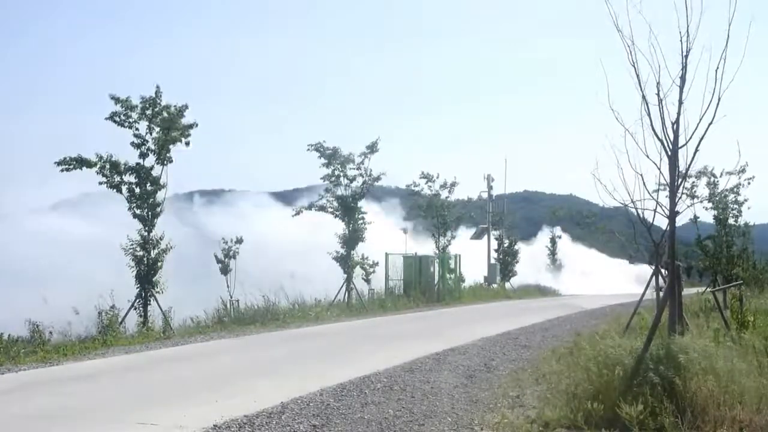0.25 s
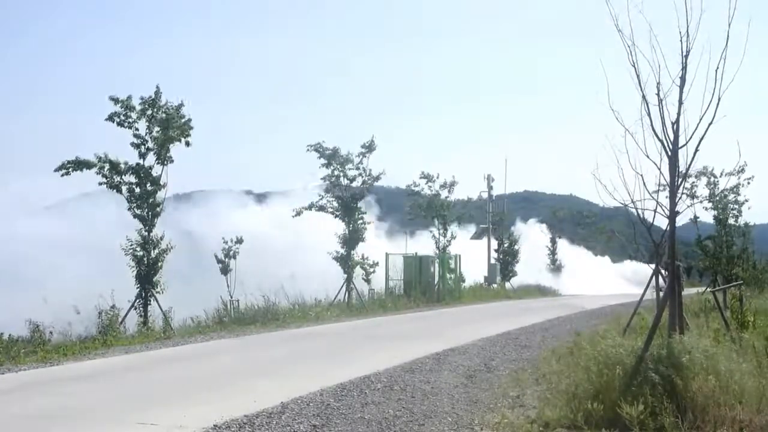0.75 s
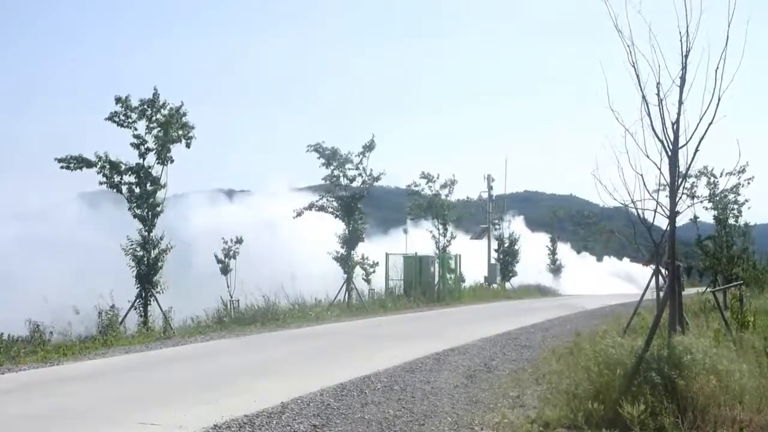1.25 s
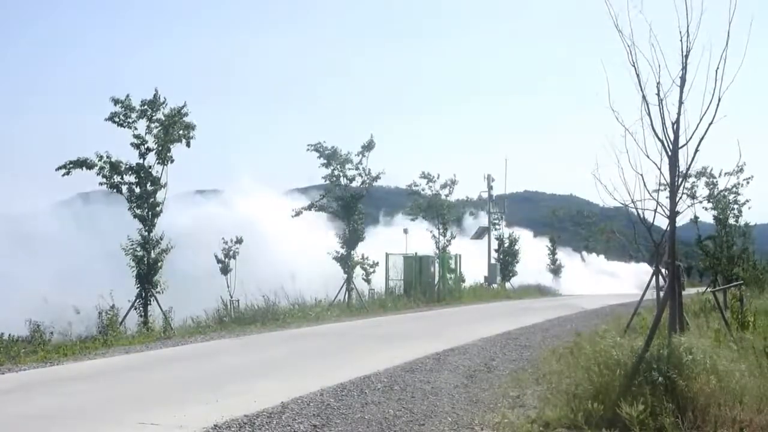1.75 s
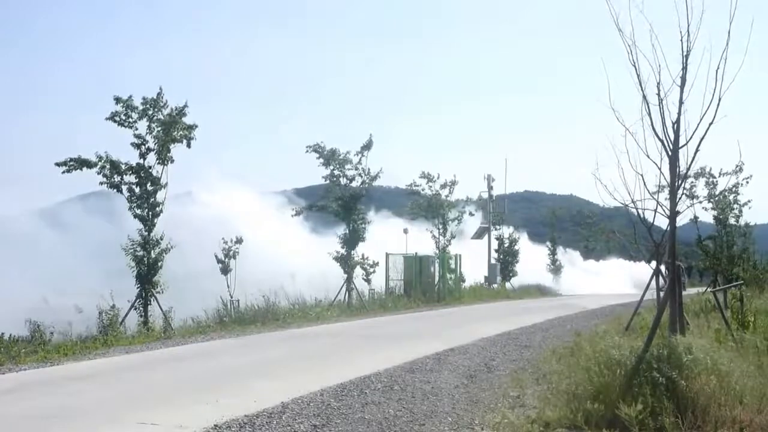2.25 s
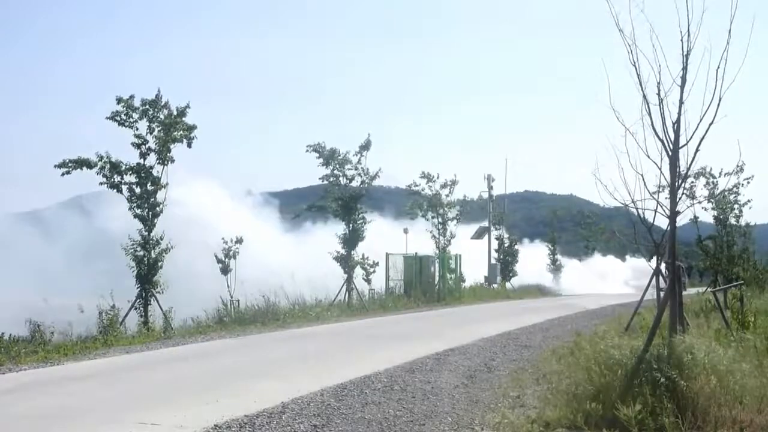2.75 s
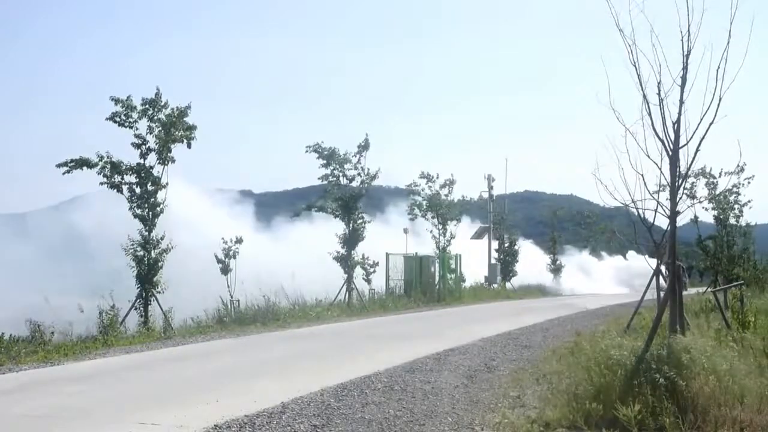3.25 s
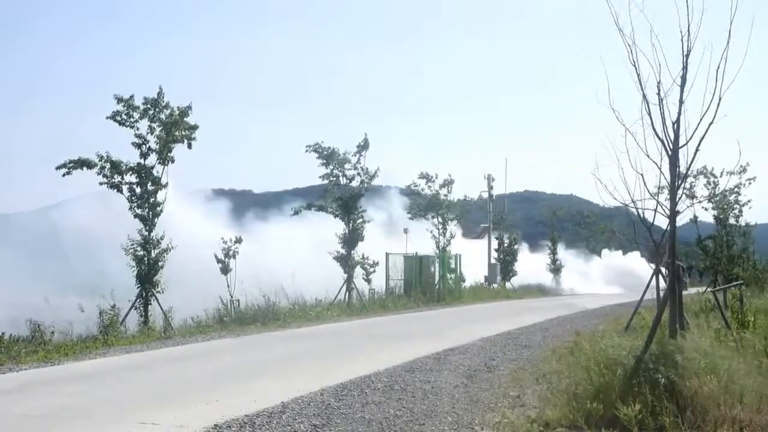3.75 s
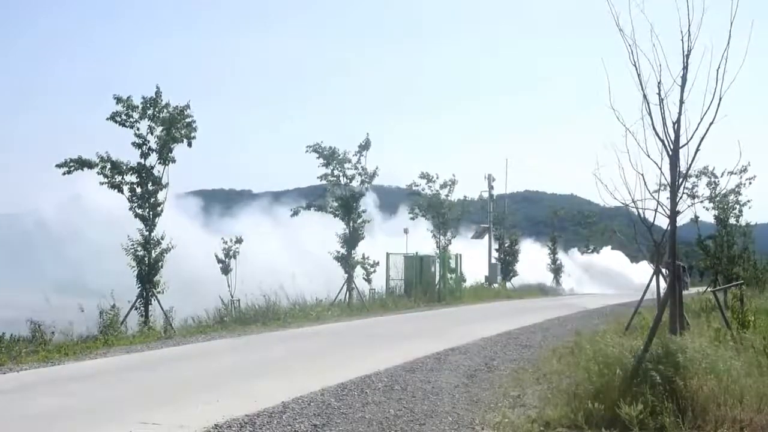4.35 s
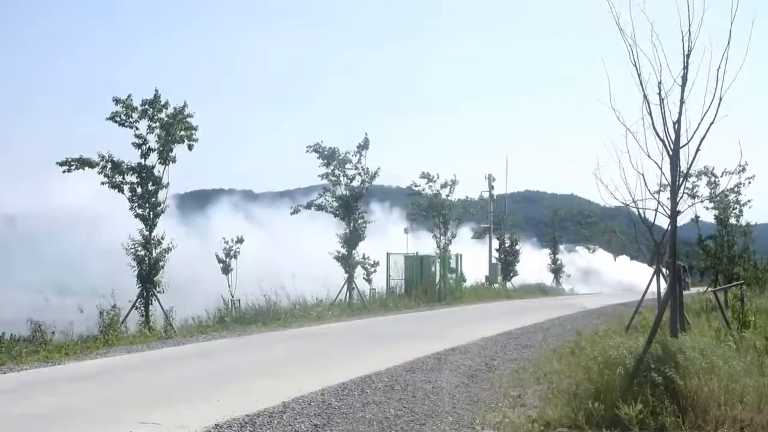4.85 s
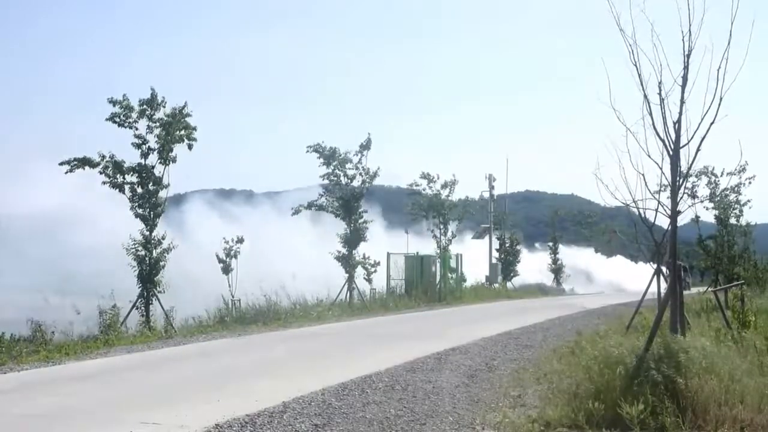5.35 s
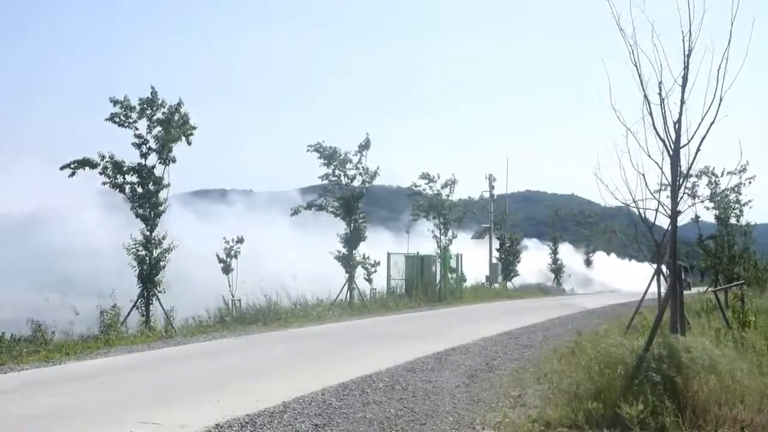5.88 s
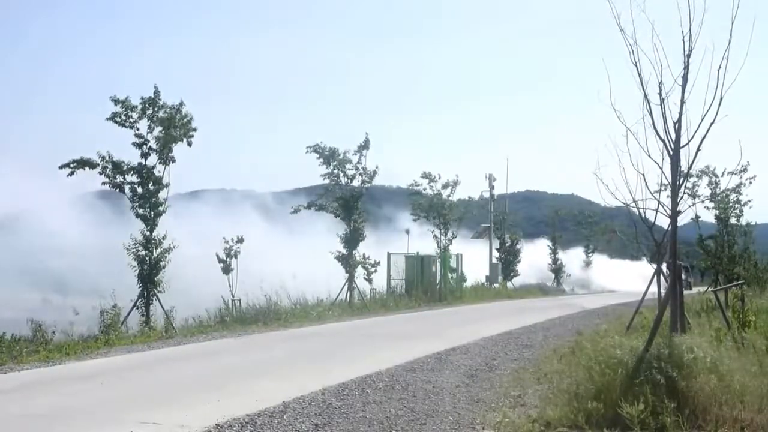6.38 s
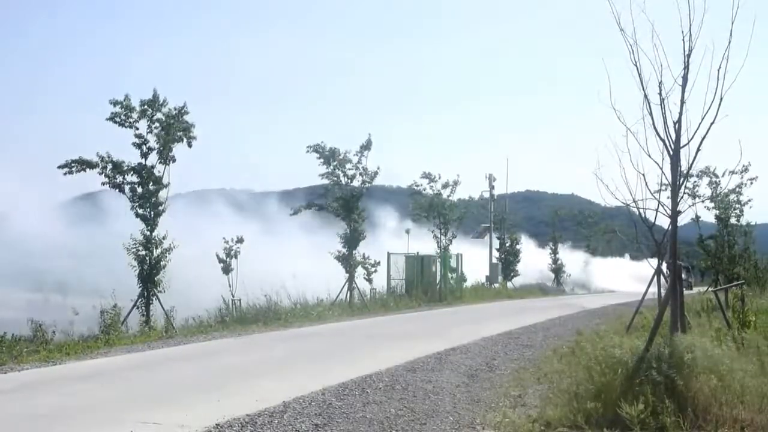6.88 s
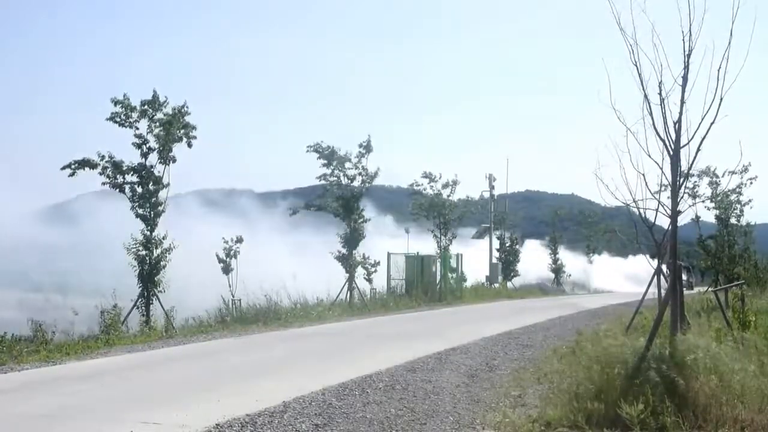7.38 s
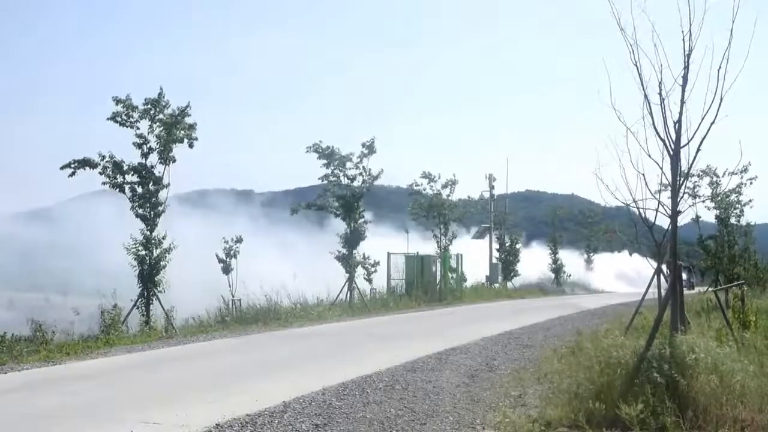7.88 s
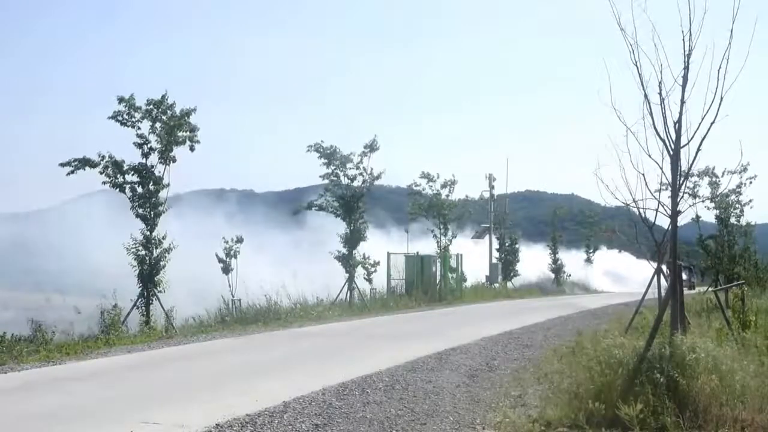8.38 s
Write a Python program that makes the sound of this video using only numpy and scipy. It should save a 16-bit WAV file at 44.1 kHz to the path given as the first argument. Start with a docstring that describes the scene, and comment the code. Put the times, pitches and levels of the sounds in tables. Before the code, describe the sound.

A continuous open-air roadside scene of about 8.6 seconds. Far off and roughly central, a pulse-jet fogger drones near 80 and 160 Hz, two tubes beating almost three times a second, with a hollow ringing exhaust roar, weak airy hiss and a faint swaying engine hum. Moving air makes it swell and dip; hiss surges at 0.3-1 s and most clearly at 3.5-4.3 s, its colour then shifting, with roar lifts around 6.5 and 8.5 s. Louder wind rumbles at the microphone, uneven between channels: the left is smoother, swelling at 3.3 s; the right flutters, thumps throughout and slaps in clusters at 1-1.5, 2.3-2.8, 3.9, 5-5.4 and 7.4-7.6 s. Brief lulls come near 6.4 and 8 s. Tiny bright insect- or bird-like ticks appear at 6.8, 7.3, 7.55 and 8.2-8.3 s.

```python
"""Distant pulse-jet fogger in wind.

A twin-tube fogger drones far down a country road: its tubes fire near 80 times a second and beat.
Pulsed noise rings in the exhaust pipes and hisses from the nozzle; a swaying sine is the carrier's engine.
Moving air makes the machine swell and fade. Shaped noise buffets the microphone, with thumps and slaps
strongest on the right port; a few small bright ticks sound close by."""
import sys
import numpy as np
from scipy import signal
from scipy.fft import rfft, irfft, next_fast_len
from scipy.io import wavfile
from scipy.ndimage import uniform_filter1d, map_coordinates

SR = 44100
rng = np.random.default_rng(int(sys.argv[2]) if len(sys.argv) > 2 else 0)


def master_out(mix):
    """Clip the mix to full scale and print it as 16-bit PCM to the path in sys.argv[1]."""
    frames = np.transpose(np.atleast_2d(mix))
    ceiling = np.clip(frames, -1, 1)
    pcm = np.round(ceiling * 32767).astype(np.int16)
    wavfile.write(sys.argv[1], SR, pcm)


N = 380274


def amp(db):
    """Decibels to gain."""
    return 10 ** (np.asarray(db) / 20)


def unit(x):
    """Scaled to rms 1."""
    return x / np.sqrt(np.mean(x ** 2) + 1e-20)


def curves(rows):
    """One value per sample for each column after the time."""
    s, *cols = np.transpose(rows)
    return [np.interp(np.arange(N) / SR, s, c) for c in cols]


def wobble(rate):
    """A smooth random curve, rate knots a second."""
    knots = rng.standard_normal(int(N * rate / SR) + 4)
    return map_coordinates(knots, [np.arange(N) * rate / SR])


def swells(rows, attack_s, release_s):
    """Gain of (start, length, dB) events: each rises, holds and lets go."""
    t = np.arange(N) / SR
    total = 0
    for start_s, length_s, db in rows:
        rise = np.clip((t - start_s) / attack_s + .5, 0, 1)
        fall = np.clip((start_s + length_s - t) / release_s + .5, 0, 1)
        total = total + amp(db) * rise * fall
    return total


def filtered(x, response):
    """x times a response of frequency."""
    m = next_fast_len(N + SR // 2)
    return irfft(rfft(x, m) * response(np.fft.rfftfreq(m, 1 / SR)), m)[..., :N]


def coloured(x, points):
    """x shaped by (Hz, dB) points on a log axis."""
    f, db = np.transpose(points)
    return filtered(x, lambda hz: amp(np.interp(np.log(hz + 1), np.log(f + 1), db)))


def peak(hz, centre_hz, width_hz):
    """Power response of one resonance with steep flanks."""
    return (1 + ((hz - centre_hz) / width_hz) ** 2) ** -4


def resonate(x, modes):
    """x through (Hz, width Hz, dB) resonances, summed in power."""
    return filtered(x, lambda hz: np.sqrt(sum(amp(db) ** 2 * peak(hz, c, w) for c, w, db in modes)))


def noise_pair(alike):
    """Left and right white noise that share a part of their power."""
    share = np.clip(alike, 0, 1)
    return np.sqrt(share) * rng.standard_normal(N) + np.sqrt(1 - share) * rng.standard_normal((2, N))


def pan(lean_db):
    """Channel gains for a left-minus-right level."""
    return amp([[lean_db / 2], [-lean_db / 2]])


FIRING_HZ = 80.3
BEAT_HZ = 2.85  # mean excess of the second tube's firing rate


def firing_cycles(wander_hz, jitter, drift_hz):
    """Cycle count of each tube: a common fuel feed sways both, and burns come a little early or late."""
    rate_hz = FIRING_HZ + wander_hz * wobble(4)
    beat_hz = BEAT_HZ + drift_hz * wobble(0.99)
    return [np.cumsum(r) / SR + jitter * wobble(30) for r in (rate_hz, rate_hz + beat_hz)]


def puffs(cycles, depth):
    """Gas flow that surges once a firing."""
    return unit(np.exp(depth * np.cos(2 * np.pi * cycles)))


# Clean drone of one tube. Each row: multiple of the firing rate, level in dB.
DRONE_ORDERS = [(1, -0.5), (2, -1.5), (3, -37), (4, -19.5), (5, -28.5), (6, -23), (7, -25)]
DRONE_DB, DRONE_DB_PER_ROAR_DB = -30, 1  # mean level, gain per dB of roar
SECOND_TUBE_DB = -4  # against the first


def drone(tubes, swell_db, flicker_db):
    """Clean low orders of both tubes, throbbing as they drift in and out of step."""
    tone = 0
    for cycles, tube_db in zip(tubes, (0, SECOND_TUBE_DB)):
        for order, order_db in DRONE_ORDERS:
            gain = amp(tube_db + order_db + flicker_db * wobble(12))
            tone = tone + gain * np.cos(2 * np.pi * order * cycles)
    return amp(DRONE_DB + DRONE_DB_PER_ROAR_DB * swell_db) * unit(tone) * pan(-.5)


def wandering(x, share, rate):
    """x with its pitch swaying by a small share, as the gas heats and cools."""
    place = np.arange(N) + np.cumsum(share * wobble(rate))
    return np.array([map_coordinates(side, [place], mode="mirror") for side in x])


# Exhaust pipe resonances. Each row: centre in Hz, width in Hz, level in dB before the nozzle swings, dB after.
PIPE_MODES = [(201, 32, -7.5, -6), (285, 21, .5, 2), (317, 31, -6.5, -7.5), (404, 26, -12, -13.5),
              (447, 33, -17, -17), (480, 22, -9, -11.5), (556, 45, -16, -17), (587, 26, -9.5, -12.5),
              (640, 21, -17, -18), (700, 56, -17, -17), (805, 90, -22.5, -21.5), (983, 89, -24.5, -24),
              (1065, 24, -19.5, -19), (1215, 75, -25, -21), (1362, 65, -28, -29), (1469, 51, -31, -33)]
PIPE_WANDER = .009  # typical pitch sway, as a share


def exhaust(flow, swing):
    """The pipes ring, pulsing with the flow; their balance shifts as the nozzle swings round."""
    gas = noise_pair(0.96)
    before = resonate(gas, [(hz, width, db) for hz, width, db, _ in PIPE_MODES])
    after = resonate(gas, [(hz, width, db) for hz, width, _, db in PIPE_MODES])
    ringing = (1 - swing) * before + swing * after
    return unit(flow * wandering(ringing, PIPE_WANDER, rate=5))


# Jet hiss spectra before, halfway through and after the swing. Each row: Hz, relative density in dB per Hz.
JET_BEFORE = [(700, -6), (1450, 5), (1580, -3), (1820, -6.5), (2350, 1.5), (2720, -5), (2920, -2.5),
              (3150, -12), (3450, -6), (4000, -6), (4500, -13), (5100, -13), (6500, -23), (11000, -32)]
JET_TURNING = [(700, 3.5), (1400, 7), (1570, -6), (1740, -7), (2080, 3), (2500, 0), (3100, -5.5),
               (3700, -4.5), (4700, -10), (5400, -15.5), (7000, -25.5), (11000, -39.5)]
JET_AFTER = [(700, 10.5), (1300, 2.5), (1550, -3), (1870, 7.5), (2120, -2), (2500, 2), (2850, 0.5),
             (3130, -6.5), (3550, -3), (4250, -3.5), (4720, -12), (5200, -9.5), (7000, -32.5), (11000, -44)]


def jet_colour(gas, swing):
    """The hiss passes through three colours as the nozzle swings round."""
    mix = 0
    for k, points in enumerate((JET_BEFORE, JET_TURNING, JET_AFTER)):
        share = np.clip(1 - abs(2 * swing - k), 0, 1)
        mix = mix + share * unit(coloured(gas, points))
    return unit(mix)


# Whooshing band: slides down through a swell, returns in one puff. Each row: time in s, centre in Hz, lift in dB.
WHOOSH = [(3.5, 6400, 0), (3.85, 6100, 5), (4.2, 5700, 6), (4.6, 5400, 5), (5.1, 5100, 2), (5.26, 5600, 0),
          (5.31, 5750, 9), (5.41, 5750, 8), (5.45, 5750, 0)]


def drifting(x, patchy_db, whoosh_width_hz):
    """Moving air brightens and dulls patches of the hiss, and one band of it whooshes."""
    hz, t, z = signal.stft(x, SR, nperseg=1024)
    field = rng.standard_normal(z.shape[1:])
    for _ in range(2):
        field = uniform_filter1d(field, size=6, axis=0)
        field = uniform_filter1d(field, size=13, axis=1)
    s, centre_hz, lift_db = np.transpose(WHOOSH)
    band = peak(hz[:, None], np.interp(t, s, centre_hz), whoosh_width_hz)
    whoosh_db = band * np.interp(t, s, lift_db)
    return signal.istft(z * amp(patchy_db * unit(field) + whoosh_db), SR, nperseg=1024)[1][:, :N]


# Narrow nozzle rings. Each row: centre in Hz, width in Hz, level in dB before the swing, dB after.
NOZZLE_MODES = [(1912, 60, -10, 0), (2360, 110, 0, -7), (4890, 130, -7, -7)]


def nozzle(flow, swing, shimmer_db):
    """Each narrow ring comes and goes on its own; the swing shifts their balance."""
    total = 0
    for hz, width_hz, before_db, after_db in NOZZLE_MODES:
        level_db = before_db + swing * (after_db - before_db) + shimmer_db * wobble(6.4)
        total = total + amp(level_db) * resonate(flow * noise_pair(0.55), [(hz, width_hz, 0)])
    return unit(total)


# High fizz spectrum. Each row: Hz, relative density in dB per Hz.
FIZZ_SPECTRUM = [(2500, -4), (5500, 3.5), (7500, 0.5), (10000, -3), (15000, -7.5)]
FIZZ_DB, FIZZ_RISE_DB_PER_S = -66.5, 0.43  # level at mid-scene, steady rise
FIZZ_DB_PER_ROAR_DB, FIZZ_DB_PER_HISS_DB = 0.7, 0.31


def fizz(roar_swell_db, hiss_swell_db, twinkle_db):
    """High noise that follows roar and hiss, flickers and slowly grows."""
    rise_db = FIZZ_RISE_DB_PER_S * (np.arange(N) - N / 2) / SR
    swell_db = FIZZ_DB_PER_ROAR_DB * roar_swell_db + FIZZ_DB_PER_HISS_DB * hiss_swell_db
    flicker_db = 0.31 * twinkle_db + 1.9 * wobble(13)
    noise = unit(coloured(noise_pair(0.14), FIZZ_SPECTRUM))
    return amp(FIZZ_DB + rise_db + swell_db + flicker_db) * noise * pan(-.8)


# How well the air carries the sound. Each row: time in s, exhaust roar in dB, jet hiss in dB.
CARRY = [(0, -39, -57.5), (.37, -37, -51), (.52, -44.5, -51.5), (.7, -37, -50.5), (1.8, -39, -57.5),
         (2.05, -38, -57), (2.36, -36.5, -56.5), (2.57, -42.5, -61), (2.9, -40, -57.5), (3.3, -35, -51.5),
         (3.75, -36, -47), (4.0, -39.5, -49.5), (4.36, -41.5, -51.5), (4.58, -39.5, -52),
         (4.85, -41, -56.5), (5.38, -39.5, -58.5), (5.48, -43, -61.5), (5.7, -41, -58),
         (6.28, -40.5, -56.5), (6.5, -32.5, -51), (6.7, -32.5, -52.5), (6.76, -41, -55), (6.9, -38, -52.5),
         (7.04, -40, -53.5), (7.28, -37.5, -50.5), (7.47, -39, -57.5), (7.87, -38, -57.5),
         (8.05, -35.5, -52), (8.35, -34, -54), (8.51, -31, -53.5), (8.62, -34.5, -56.5)]
# Hiss surges carried in on the air. Each row: start in s, length in s, level in dB.
SURGES = [(.33, .06, -56), (.58, .13, -55), (.8, .2, -58), (1.25, .11, -57.5), (1.43, .08, -56.5),
          (2.26, .09, -58), (3.53, .07, -48.5), (3.64, .1, -51.5), (3.77, 0.09, -47), (4.05, .17, -49.5),
          (4.28, .14, -54), (4.48, .12, -57), (5.29, 0.14, -57.5), (5.8, .07, -59), (6.46, .26, -52)]
SURGE_ATTACK_S, SURGE_RELEASE_S = 0.026, 0.016
# Nozzle swing. Each row: time in s, share from 0 to 1.
SWING = [(0, 0.13), (3.4, 0), (4.2, .45), (4.7, .55), (5.4, 1), (8.6, 0.96)]
# Extra hiss brightness in clear air. Each row: Hz, gain in dB.
CLEAR_AIR = [(1000, -1.5), (2500, -1), (4000, 1.2), (6000, 1.5), (10000, 0)]


def fogger():
    """Each burn throws a puff of turbulent gas through the pipes and out of the nozzle."""
    roar_db, hiss_db = curves(CARRY)
    surge = swells(SURGES, SURGE_ATTACK_S, SURGE_RELEASE_S)
    hiss_db = 20 * np.log10(np.hypot(amp(hiss_db), surge))
    roar_swell_db = roar_db - roar_db.mean()
    hiss_swell_db = hiss_db - hiss_db.mean()
    swing = np.clip(curves(SWING)[0], 0, 1)

    tubes = firing_cycles(wander_hz=.7, jitter=0.08, drift_hz=0.35)
    # distance smears the puffs, and the free jet keeps even less of the pulsing
    flow = unit(puffs(tubes[0], depth=.19) + .6 * puffs(tubes[1], depth=.18))
    jet_flow = puffs(tubes[0], depth=.09)
    roar = amp(roar_db + 0.85 * wobble(14)) * exhaust(flow, swing) * pan(1)

    gas = filtered(jet_flow * noise_pair(0.53), lambda hz: 1 / (1 + (600 / (hz + 1)) ** 4))
    jet = jet_colour(gas, swing)
    # a surge is brighter as well as louder
    clear = surge / amp(hiss_db)
    jet = (1 - clear) * jet + clear * coloured(jet, CLEAR_AIR)
    # turbulence along the path makes the short waves twinkle
    twinkle_db = 1.05 * wobble(14) + 1.16 * wobble(45)
    hiss = amp(hiss_db + twinkle_db) * drifting(jet, patchy_db=2, whoosh_width_hz=650) * pan(-1.7)

    ring = amp(0.98 * hiss_swell_db - 66.5) * nozzle(flow, swing, shimmer_db=3)
    high = fizz(roar_swell_db, hiss_swell_db, twinkle_db)
    return drone(tubes, roar_swell_db, flicker_db=2.0) + roar + hiss + ring + high


def carrier(hum_hz, db):
    """The engine of the vehicle that carries the fogger: one sine, swaying in level and slightly in pitch."""
    cycles = np.cumsum(hum_hz + .5 * wobble(2.09)) / SR
    return amp(db + 4.0 * wobble(2.8)) * np.sqrt(2) * np.sin(2 * np.pi * cycles)


def buffet(spectrum, lump_db, rate):
    """Turbulence on one port, arriving in lumps."""
    noise = coloured(rng.standard_normal(N), spectrum)
    return unit(amp(lump_db * wobble(rate)) * noise)


# Sheltered left port: wind spectrum. Each row: Hz, relative density in dB per Hz.
LEE_SPECTRUM = [(3, -24), (12, 1.5), (35, 1), (60, -3), (105, -11), (150, -14), (240, -25), (370, -32),
                (700, -52), (2000, -88)]
# Sheltered left port: wind strength. Each row: time in s, level in dB.
LEE_LEVEL = [(0, -35), (1.2, -30), (2.2, -28), (3.0, -33.5), (3.3, -21.5), (3.6, -24.5), (4.9, -27),
             (5.2, -24.5), (5.5, -28.5), (6.4, -30.5), (7.2, -27.5), (8.0, -29.5), (8.62, -40)]


def lee_wind():
    """Low turbulence of the sheltered left port."""
    return amp(curves(LEE_LEVEL)[0]) * buffet(LEE_SPECTRUM, lump_db=3, rate=10)


# Right port: rumble spectrum. Each row: Hz, relative density in dB per Hz.
RUMBLE_SPECTRUM = [(3, -29), (12, -1), (30, 1), (65, -1), (110, -6), (160, -16), (220, -15), (350, -52),
                   (700, -48), (2000, -92)]


def rumble(breeze_db):
    """Low turbulence of the windward right port, as strong as the breeze."""
    return amp(breeze_db) * buffet(RUMBLE_SPECTRUM, lump_db=2.2, rate=18)


# Right port: flutter spectrum. Each row: Hz, relative density in dB per Hz.
FLUTTER_SPECTRUM = [(30, -21.5), (90, 2.5), (190, 1.5), (280, -7.5), (400, -12.5), (600, -22.5),
                    (1000, -36.5), (2500, -74.5)]
# Gusts that tear off the right port. Each row: start in s, length in s, flutter level in dB.
GUSTS = [(0.19, 0.327, -26.5), (0.93, 0.22, -23.5), (1.4, 0.15, -22.5), (1.71, 0.097, -24),
         (2.28, 0.22, -26), (2.64, 0.207, -25), (3.85, .08, -21), (5.03, 0.19, -26.5), (5.35, 0.107, -24.5),
         (5.569, 0.044, -27.5), (6.12, 0.204, -32), (6.84, 0.186, -28.5), (7.371, 0.058, -22.5),
         (7.512, 0.095, -31)]
GUST_ATTACK_S, GUST_RELEASE_S = 0.038, 0.046
FLUTTER_DB, FLUTTER_DB_PER_WIND_DB = -34.5, 1.9  # between gusts: mean level, gain per dB of wind


def flutter(swell_db):
    """Torn-off flow flutters above the rumble, most in gusts."""
    gusts = swells(GUSTS, GUST_ATTACK_S, GUST_RELEASE_S)
    between = amp(FLUTTER_DB + FLUTTER_DB_PER_WIND_DB * swell_db)
    return np.hypot(between, gusts) * buffet(FLUTTER_SPECTRUM, lump_db=2.5, rate=45)


# Large slow eddies on the right port. Each row: centre time in s, peak in dB.
THUMPS = [(.049, -14), (.396, -13), (.489, -14), (.791, -15), (.967, -12.5), (1.24, -14), (1.655, -12),
          (1.958, -11), (2.181, -15), (2.412, -15), (3.143, -14), (3.376, -14), (3.642, -14), (3.683, -15),
          (4.142, -13), (4.349, -13.5), (4.533, -13), (4.808, -14), (4.859, -14), (5.44, -14), (5.76, -12),
          (5.857, -15), (5.884, -13), (6.11, -14.5), (6.179, -15), (6.727, -14), (6.835, -13), (6.955, -14),
          (7.014, -14), (7.278, -13), (7.477, -15), (7.838, -13), (8.219, -13)]
THUMP_HZ, THUMP_S = 84.5, 0.0082  # pitch and half-length before the random stretch
WAKE_DB = -5  # thump under a slap, against the slap


def thumps():
    """A large eddy rocks the port for a cycle or two; a weaker one goes with every slap."""
    t, out = np.arange(SR // 16) / SR, np.zeros(N + SR)
    u = t - t.mean()
    eddies = THUMPS + [(s, db + WAKE_DB) for s, db, _ in SLAPS]
    for (s, db), (size, turn) in zip(eddies, rng.uniform(-1.06, 1, (len(eddies), 2))):
        stretch = 1.54 ** size
        bell = np.exp(-(u / (THUMP_S * stretch)) ** 2 / 2)
        rock = bell * np.cos(2 * np.pi * THUMP_HZ * u / stretch + np.pi * turn)
        out[round((s - t.mean()) * SR):][:len(t)] += amp(db) * rock
    return out[:N]


# Small fast eddies on the right port. Each row: centre time in s, peak in dB, crossing time (centre to peak) in s.
SLAPS = [(.25, -18, .0009), (.668, -18, .0009), (.944, -21, .0006), (1.03, -14.5, .0009),
         (1.073, -15, .0011), (1.108, -15, .0011), (1.253, -21, .0008), (1.381, -17, .00055),
         (1.428, -18.5, .00065), (1.451, -14, .001), (1.476, -16, .00075), (1.496, -13.5, .00085),
         (1.516, -14, .0011), (1.658, -18, .0009), (1.74, -18.5, .0007), (1.791, -14.5, .00085),
         (2.149, -20, .00048), (2.336, -15, .001), (2.372, -16, .0006), (2.575, -18, .0008),
         (2.655, -14, .0009), (2.665, -19.5, .0006), (2.739, -15, .0009), (2.765, -11.5, .00092),
         (2.803, -13.5, .00085), (2.838, -15, .0009), (3.856, -14.5, .001), (3.866, -15, .0009),
         (3.892, -12, .00078), (3.938, -14, .0011), (4.021, -14, .0013), (4.257, -15, .0012),
         (4.587, -11.5, .00062), (4.66, -17, .0009), (4.805, -17.5, .00066), (4.950, -17.5, .0006),
         (5.016, -19, .00052), (5.047, -16.5, .00055), (5.053, -15.5, .00047), (5.059, -18.5, .0005),
         (5.105, -18.5, .0006), (5.118, -18, .0007), (5.156, -22, .0006), (5.186, -20, .00065),
         (5.209, -21, .0007), (5.214, -16.5, .0005), (5.357, -19, .0007), (5.364, -13.5, .00055),
         (5.416, -13, .0011), (5.764, -17, .0011), (5.887, -18, .001), (5.97, -18, .00046),
         (6.217, -21, .0008), (7.38, -14, .001), (7.54, -13.5, .0012), (7.56, -13.5, .001),
         (7.608, -16, .0009), (7.776, -20, .0005)]
SLAP_TAIL = 7.8  # lower = longer tails


def slaps():
    """A small eddy crossing the port gives one quick push and pull."""
    t, out = np.arange(SR // 50) / SR, np.zeros(N + SR)
    for s, peak_db, crossing_s in SLAPS:
        u = (t - t.mean()) / crossing_s
        push = u * ((SLAP_TAIL + 1) / (SLAP_TAIL + u * u)) ** ((SLAP_TAIL + 1) / 2)
        out[round((s - t.mean()) * SR):][:len(t)] += amp(peak_db) * push
    return out[:N]


# Right-port wind strength, steady with two lulls. Each row: time in s, level in dB.
BREEZE = [(0, -22), (1, -21), (2.9, -21.5), (4.7, -20), (6.2, -20.5), (6.43, -28), (6.7, -21.5), (7.8, -20),
          (8.02, -27.5), (8.62, -19)]
LEAK_DB = -17  # slaps and thumps reaching the left port


def wind():
    """Each port has its own turbulence; on the windward right port the flow tears off and slaps."""
    breeze_db, = curves(BREEZE)
    eddies = slaps() + thumps()
    left = lee_wind() + amp(LEAK_DB) * eddies
    right = rumble(breeze_db) + flutter(breeze_db - breeze_db.mean()) + eddies
    return np.array([left, right])


# Ticks near the microphone. Each row: start in s, level in dB, centre in Hz, width in Hz, t60 in s, L-R in dB.
TICKS = [(6.797, -52.5, 4900, 900, .07, -3), (7.317, -33, 5850, 1400, .017, -1),
         (7.529, -57, 10000, 5000, .03, -1), (7.555, -40.5, 6100, 1900, .015, -1),
         (7.556, -63, 7450, 450, .16, -1), (8.233, -47, 7000, 4000, .045, 3),
         (8.322, -41, 10500, 4400, .015, 3)]


def ticks():
    """Small bright ticks, perhaps insect or bird chips: a brief crack with one broad resonance."""
    out, t = np.zeros((2, N + SR)), np.arange(SR // 10) / SR
    for s, db, hz, width_hz, t60_s, lean_db in TICKS:
        crack = rng.standard_normal((2, len(t)))
        response = np.sqrt(peak(np.fft.rfftfreq(len(t), 1 / SR), hz, width_hz))
        body = irfft(rfft(crack) * response, len(t))
        envelope = (1 - np.exp(-t / .0012)) * amp(db - 60 * t / t60_s)
        tick = unit(body + .06 * crack) * envelope
        out[:, round(s * SR):][:, :len(t)] += tick * pan(lean_db)
    return out[:, :N]


def scene():
    """The far machine, with wind and ticks at the microphone."""
    return fogger() + carrier(hum_hz=125, db=-45) + wind() + ticks()


TOP_HZ = 15000


def record(dry):
    """Everything above TOP_HZ is left out."""
    return filtered(dry, lambda hz: hz < TOP_HZ)


dry = scene()
out = record(dry)
master_out(out)
```